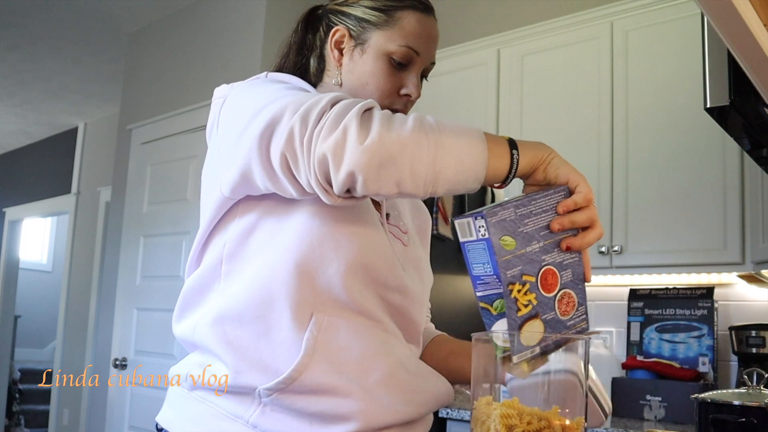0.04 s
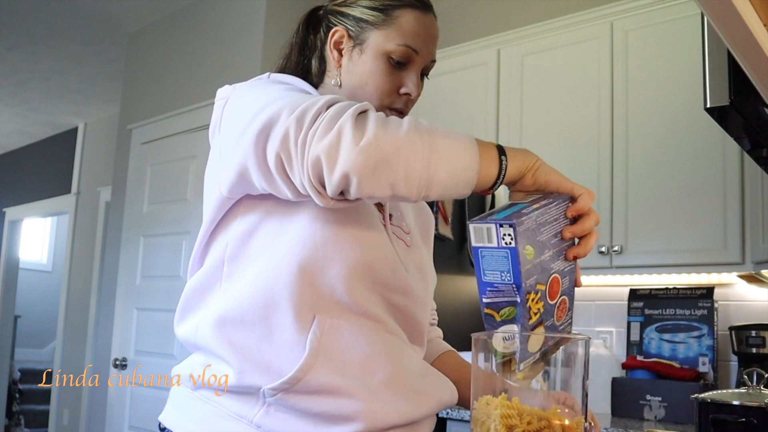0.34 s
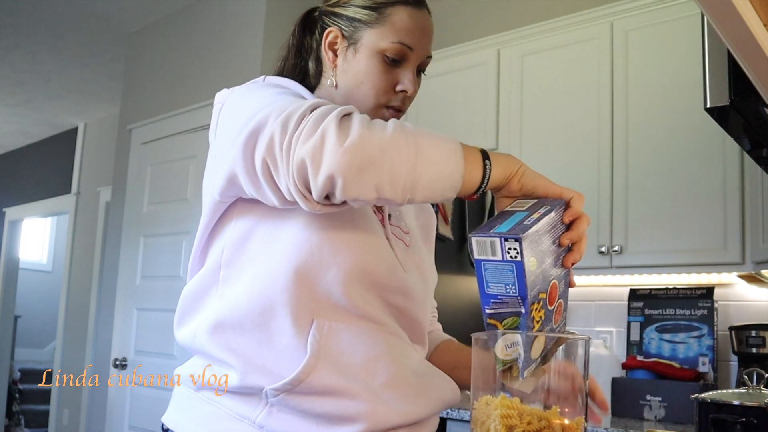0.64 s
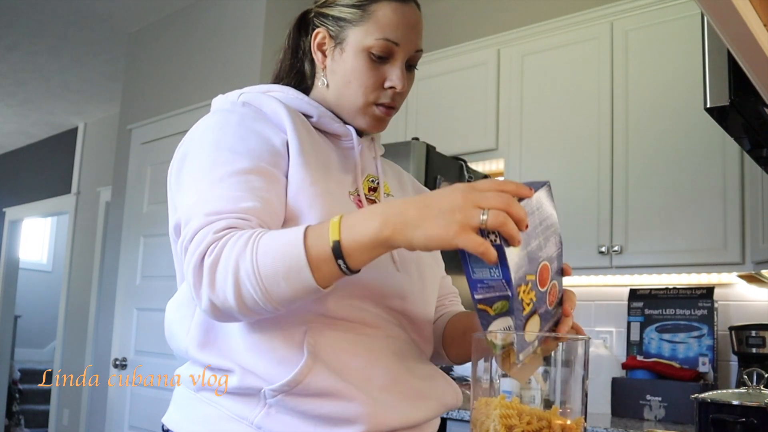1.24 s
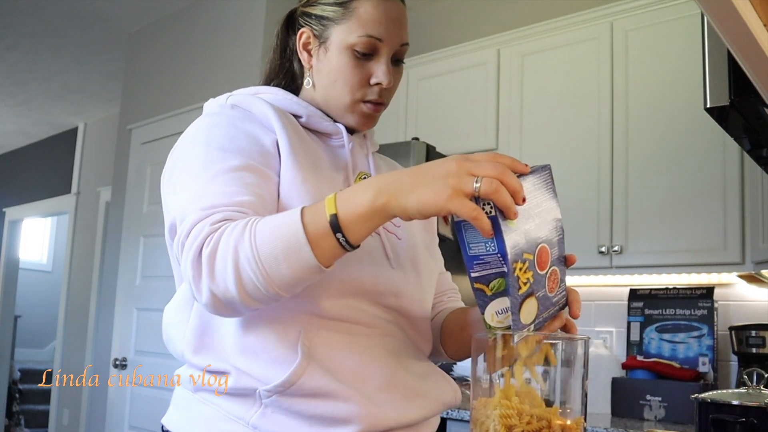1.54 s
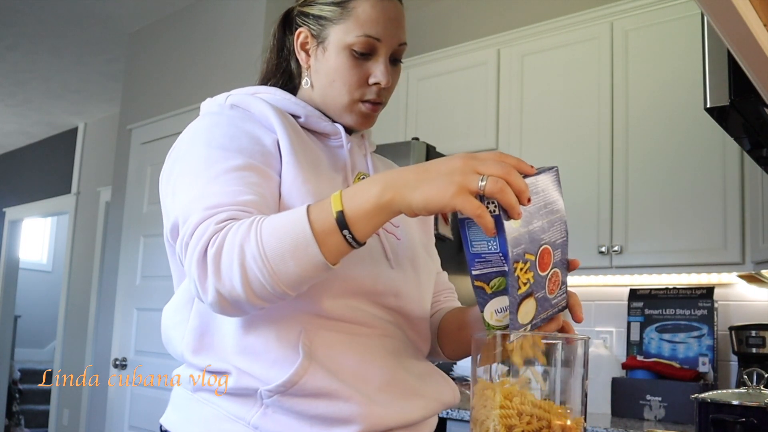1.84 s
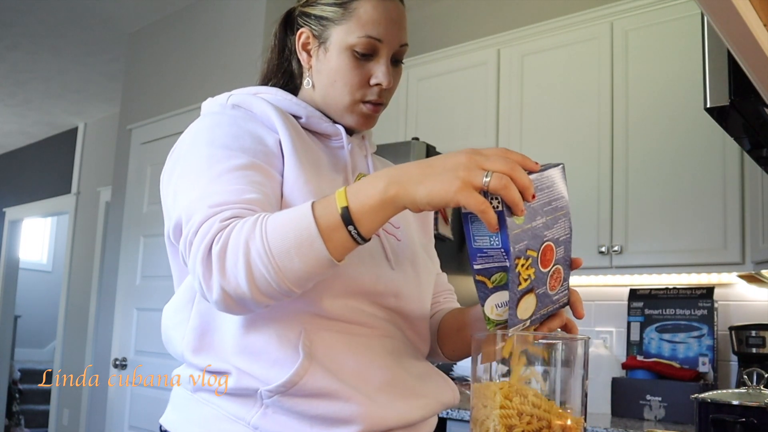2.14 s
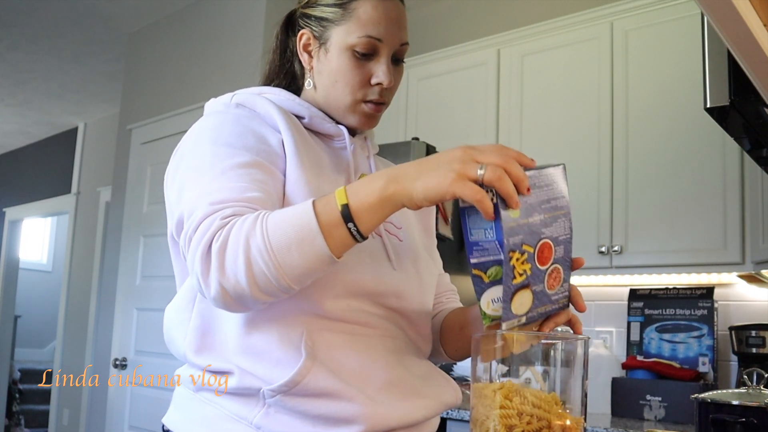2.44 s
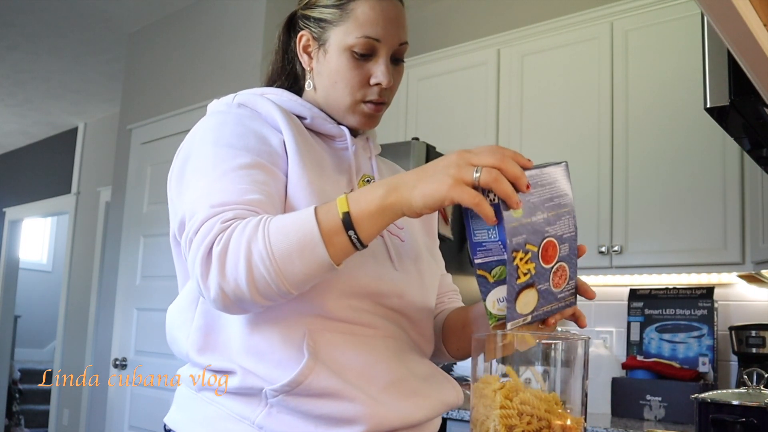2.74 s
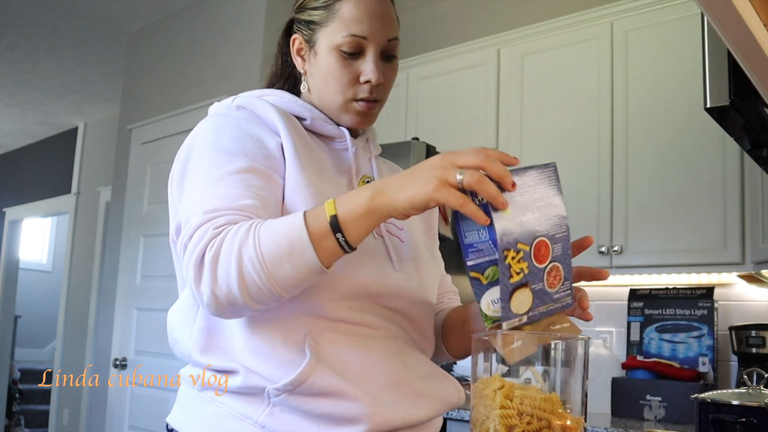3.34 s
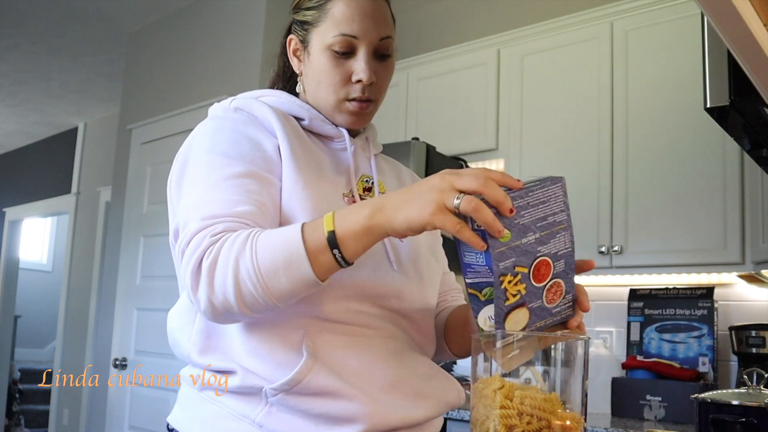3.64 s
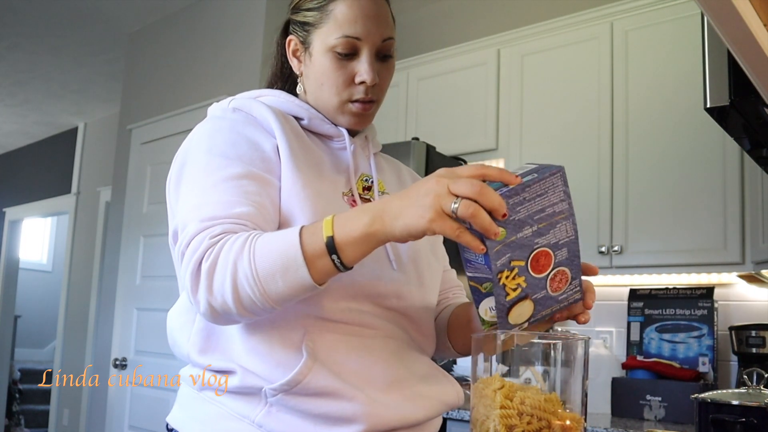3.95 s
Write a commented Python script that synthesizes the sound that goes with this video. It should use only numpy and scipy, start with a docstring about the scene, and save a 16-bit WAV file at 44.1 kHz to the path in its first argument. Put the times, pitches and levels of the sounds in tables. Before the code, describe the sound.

Dry pasta shifts in a cardboard box, and something hard knocks twice on a counter. The pasta then rattles into a plastic jar, thinning to clumps before the box thumps. It is heard close up in a softly humming kitchen.

```python
"""A quiet kitchen with a low hum. Dry pasta slides about in a cardboard box, then pours into a
plastic jar: a dense rush that thins to single clumps. Early on, something hard is set down on the
counter with a double knock; at the end the box thumps and the rest slides back.
Each of these is a crowd of small contacts that crack and set the box, jar or counter ringing.
They are shaped in three bands: body (low), clack (middle) and tick (high)."""
import sys
import numpy as np
from scipy import signal
from scipy.fft import rfft, irfft
from scipy.io import wavfile
from scipy.ndimage import uniform_filter1d

SR = 44100
rng = np.random.default_rng(int(sys.argv[2]) if len(sys.argv) > 2 else 0)


def write(x):
    x = np.atleast_2d(x).T
    wavfile.write(sys.argv[1], SR, np.round(np.clip(x, -1, 1) * 32767).astype(np.int16))


N = 176400


def amp(db):
    """Turn decibels into a gain."""
    return 10 ** (np.asarray(db) / 20)

def unit(x):
    """Scale a sound so its energy is 1."""
    return x / np.sqrt(np.sum(x ** 2) + 1e-18)

def fade(t, t60):
    """Die away by 60 dB every t60 seconds; the tables call this time ring_s."""
    return np.exp(-np.log(1000) * t / t60)

def on_log_axis(table, hz):
    """Read between a table's rows, giving each octave equal room."""
    points = np.array(table, float)
    return np.interp(np.log(hz + 1), np.log(points[:, 0]), points[:, 1])

def colour(x, table):
    """Turn pitches up or down by a table of pitch_hz, level_db."""
    cepstrum = irfft(np.log(amp(on_log_axis(table, np.linspace(0, SR / 2, 4097)))))
    cepstrum[1:4096] *= 2
    cepstrum[4097:] = 0  # so the filter never sounds ahead of a hit
    return signal.fftconvolve(x, irfft(np.exp(rfft(cepstrum))))[:len(x)]

def split(x, low_hz=1100, high_hz=5000):
    """Cut a sound into body, clack and tick."""
    def cut(sound, hz, kind):
        return signal.lfilter(*signal.butter(4, hz, kind, fs=SR), sound)
    clack = cut(cut(x, high_hz, "low"), low_hz, "high")
    return [cut(x, low_hz, "low"), clack, cut(x, high_hz, "high")]

# The tone of one dry contact: pitch_hz, level_db
CRACK_TONE = [(60, -47.5), (200, -11.5), (350, -2.5), (1000, 0.5), (2200, -2.5), (3500, -6), (5500, -10),
              (8000, -9.5), (11300, -3.5), (13000, -24), (16000, -81)]
def crack(envelope):
    """Hard things touch with a short burst of noise."""
    return unit(colour(rng.standard_normal(SR // 2)[:len(envelope)] * envelope, CRACK_TONE))

def ring(notes, t, pitch=1, spot_db=3, detune=.028):
    """A struck object rings at its own notes; each spot shifts them and favours different ones."""
    out = 0
    for hz, db, ring_s in notes:
        shift, spot, side = rng.standard_normal(3)
        note = fade(t, ring_s) * np.sin(2 * np.pi * hz * pitch * (1 + detune * shift) * t)
        out += np.sign(side) * amp(db + spot_db * np.clip(spot, -1, 1)) * unit(note)
    return out

def piece(notes, crack_db, crack_s):
    """One piece lands: a crack, the container's ring and its own short, high ring."""
    t = np.arange(SR // 10) / SR
    own_hz = rng.uniform(2700, 12150, size=4)
    own_ring = sum(unit(fade(t, t60=.012) * np.sin(2 * np.pi * hz * t)) for hz in own_hz)
    hit = amp(crack_db) * crack(fade(t, crack_s)) + ring(notes, t) + amp(-17.5) * own_ring
    return np.array([unit(band) for band in split(hit)])

def stream(table, notes, peak_per_s, scatter_db, crack_db, crack_s, gain_db, kinds=24):
    """Pieces land at random, tumbling in bunches; a stronger flow has more of them."""
    rows, t = np.array(table, float), np.arange(N) / SR
    times = rows[:, 0]
    levels = [amp(np.interp(t, times, rows[:, k + 1]) + gain_db[k]) for k in range(3)]
    gate = np.interp(t, [times[0] - .02, times[0], times[-1], times[-1] + .022], [0, 1, 1, 0])
    rate = peak_per_s * (levels[1] / levels[1].max()) ** .45
    strength = amp(np.outer(scatter_db, np.clip(rng.standard_normal(N), -2, 2)))
    force = (rng.random(N) < rate / SR) * strength * rng.choice([-1, 1], N)
    power = uniform_filter1d(uniform_filter1d(force ** 2, size=2000), size=2000)
    force *= gate / np.sqrt(power + 1e-5)  # even out the flow so the table shapes its loudness
    bunch_s, bunch_db = .012, (.7, 1, 3)
    bunch = np.clip(rng.standard_normal(N), -1.5, 1.5)[(t / bunch_s).astype(int)]
    force *= amp(np.outer(bunch_db, bunch))
    pieces = [piece(notes, crack_db, crack_s) for _ in range(kinds)]
    which = rng.integers(kinds, size=N)
    out = np.zeros((3, N + SR))
    for at in np.flatnonzero(force[0]):
        sound = pieces[which[at]]
        out[:, at:at + sound.shape[1]] += force[:, at, None] * sound
    return levels * out[:, :N]

def blows(table, notes, crack_db, crack_s, follow, gain_db, length_s=.12, count=9):
    """Each blow is one contact with a few more close behind; follow sets how strong those are."""
    out, t = np.zeros((3, N + SR)), np.arange(int(length_s * SR)) / SR
    push_s, level_s = .0011, .025  # the force's build-up; the opening stretch that sets the level
    contact = fade(t, crack_s) * (1 - np.exp(-t / push_s))
    for row in table:
        start_s, spread_ms, levels, pitch = row[0], row[1], row[2:5], row[5:]
        late = np.clip(rng.exponential(size=count), 0, 3)
        delays = np.minimum(late * spread_ms * SR / 1000, len(t) - 1).astype(int)
        force = np.zeros(len(t))
        force[0] = 1
        np.add.at(force, delays, follow * rng.standard_normal(count) * np.exp(-late / 2))
        envelope = np.sqrt(np.abs(signal.fftconvolve(force ** 2, contact ** 2)[:len(t)]))
        hit = amp(crack_db) * crack(envelope)
        hit += signal.fftconvolve(unit(force), ring(notes, t, *pitch))[:len(t)]
        at = int(start_s * SR)
        for k, band in enumerate(split(hit)):
            opening_level = np.sqrt(np.mean(band[:int(level_s * SR)] ** 2))
            out[k, at:at + len(t)] += band * amp(levels[k] + gain_db[k]) / opening_level
    return out[:, :N]

# The notes of the cardboard box: pitch_hz, level_db, ring_s
BOX_NOTES = [(362, -7, 0.01), (486, -6, 0.044), (651, -2.5, 0.055), (724, -0.5, 0.11), (921, -9.5, 0.092),
             (1100, -3, 0.015), (1660, 1.5, 0.028), (2095, 3, 0.019), (2770, 0.5, 0.0037)]
# The flow of pasta in the box: time_s, body_db, clack_db, tick_db
BOX_FLOW = [(0, -14, -16, -39), (0.12, -18.5, -20, -28), (0.15, -22, -24, -43), (0.21, -20.5, -17.5, -38),
            (0.28, -25.5, -31, -47), (0.335, -27.5, -29, -34), (0.4, -27, -28.5, -48),
            (0.45, -44, -41, -49), (0.65, -28, -46, -49), (0.7, -27, -44.5, -76), (0.8, -56, -59, -59),
            (0.88, -41, -44.5, -54), (0.95, -33, -39.5, -58), (1.01, -39.5, -38, -50),
            (1.04, -52, -51.5, -80), (1.14, -45, -47.5, -51), (1.2, -32.5, -32, -50),
            (1.3, -32, -33.5, -56), (1.4, -35.5, -37.5, -46)]
# Bumps inside the box: start_s, spread_ms, body_db, clack_db, tick_db
BOX_BUMPS = [(.157, 3.4, -36, -44, -50), (.35, 2.38, -24.5, -28, -41), (.362, 5.4, -21, -28.5, -50),
             (.915, 4, -34.5, -47, -49), (1.168, 7, -35, -35.5, -45), (3.412, 2.71, -25.5, -23, -62),
             (3.423, 4.7, -19, -28.5, -66), (3.446, 6.8, -20.5, -42, -65)]
def pasta_in_box():
    """Pasta slides and bumps against the cardboard, which rings briefly."""
    slide = stream(BOX_FLOW, BOX_NOTES, peak_per_s=1500, scatter_db=(5, 5, 4),
                   crack_db=11.5, crack_s=.0041, gain_db=(-4, -3.5, -3))
    bumps = blows(BOX_BUMPS, BOX_NOTES, crack_db=-1.5, crack_s=.015, follow=.91, gain_db=(-2.5, -2, -2))
    return slide + bumps

def noise(tone):
    """Steady noise with the given tone and an average power of 1."""
    return unit(colour(rng.standard_normal(N + SR), tone)[SR:]) * np.sqrt(N)

# How loud the hands are: time_s, level_db
HAND_LEVELS = [(0, -33), (.45, -67), (1.1, -59), (1.2, -34), (1.45, -81), (1.7, -42), (2.4, -48),
               (2.8, -36.5), (3.3, -40.5), (3.75, -42), (3.83, -36), (4.0, -31)]
# The tone of their rumble: pitch_hz, level_db
HAND_TONE = [(30, -3), (70, -10), (105, 10.5), (160, -15.5), (240, -1), (400, -34)]
def hands_on_box():
    """Handling the box makes a low rumble that swells and sinks."""
    return noise(HAND_TONE) * amp(np.interp(np.arange(N) / SR, *np.array(HAND_LEVELS).T))

# The tone of the room's steady noise: pitch_hz, level_db
ROOM_TONE = [(20, -32), (42, -3), (58, 11.5), (75, 0), (105, 5), (145, 6.5), (200, -7), (400, -18),
             (800, -17), (2000, -21.5), (6000, -25.5), (16000, -48)]
def kitchen_hum(air_db=-38, hum_hz=59, hum_db=-52):
    """An appliance hums over room rumble that is nearly the same in both ears."""
    air = noise(ROOM_TONE) + .084 * np.array([noise(ROOM_TONE), noise(ROOM_TONE)])
    hum = np.sqrt(2) * np.sin(2 * np.pi * hum_hz * np.arange(N) / SR)
    return amp(air_db) * air + amp(hum_db) * hum

# The notes of the plastic jar: pitch_hz, level_db, ring_s
JAR_NOTES = [(334.6, -5.5, 0.074), (358.3, 1, 0.096), (395.9, 6.5, .08), (431.6, 5, 0.066), (493, 3, 0.064),
             (630, -14, .03), (704, -0.5, 0.13), (753.6, -1.5, 0.093), (915, -0.5, 0.059),
             (1137, -7.5, .04), (1655, -4.5, 0.08), (2102, -5.5, 0.047), (2305, -5.5, .023),
             (2579, -7.5, 0.07), (3806, -9.5, 0.018)]
# Clumps landing: start_s, spread_ms, body_db, clack_db, tick_db, pitch_ratio
JAR_CLUMPS = [(.043, 3.5, -19, -21, -25.5, 1.1), (.063, 6.1, -20, -29, -19.5, 1.09),
              (.229, 8.9, -29, -24, -26.5, 1.3), (.312, 6.1, -52, -33, -38.5, 0.9),
              (.456, 4.7, -60, -38, -46, 1.4), (1.2, 4.2, -30.5, -48, -57, .92),
              (1.424, 4.4, -27, -43, -39, 1), (1.444, 4, -29.5, -46, -39, 1.06),
              (1.486, 4.6, -47, -37.5, -32, 1), (1.574, 7.5, -28, -27, -24, 1),
              (1.629, 10, -22.5, -23, -43, .98), (1.648, 5, -23.5, -25, -35, 0.84),
              (1.689, 7.7, -15.5, -31, -34, 0.99), (1.701, 7.7, -31, -21.5, -18, 0.92),
              (1.718, 12, -31, -19, -14.5, 1.14), (1.731, 4.9, -37, -30, -29, 0.99),
              (1.798, 2.4, -23.5, -16.5, -28, 1.02), (1.814, 8.7, -27, -22, -19, 1.4),
              (1.853, 5, -26, -21, -37, 1.22), (1.881, 4.6, -26, -31, -21.5, 1.07),
              (1.907, 6.9, -34, -20.5, -24, 0.99), (1.999, 5.8, -35, -27, -26.5, 0.83),
              (2.028, 7.47, -19, -26, -44, 0.98), (2.044, 6.6, -35, -26, -32, 1.2),
              (2.142, 6.6, -25.5, -26.5, -36, 0.95), (2.272, 2.25, -28, -25.5, -39, .98),
              (2.284, 5.6, -30.5, -26.5, -25, 1.08), (2.317, 3.3, -31, -22, -20, 1.05),
              (2.327, 5.8, -29, -35, -24, 1.21), (2.337, 4.4, -34, -28, -27, 0.97),
              (2.367, 2.9, -26.5, -50, -42, 0.85), (2.445, 2.8, -34, -31, -49, 1.4),
              (2.518, 4, -26.5, -30.5, -48, 1.04), (2.589, 5.3, -27, -25.5, -32, 0.91),
              (2.624, 4.9, -19, -23.5, -33, 1.22), (2.651, 9.9, -24, -24.5, -30.5, 1.1),
              (2.659, 3.9, -30, -29, -52, 1.15), (2.718, 1.8, -25, -23.5, -43, 1),
              (2.746, 3, -28, -30, -31, 1.19), (2.756, 3.9, -26, -34, -27.5, 1.04),
              (2.791, 5.8, -24.5, -29.5, -55, 1.2), (2.823, 6.3, -30, -34, -34, 1.24),
              (2.852, 4.1, -27.5, -52, -55, 0.81), (2.882, 5.6, -27.5, -54.5, -29, 1.1),
              (2.895, 5.2, -25.5, -32.5, -37, 0.96), (2.945, 4.15, -27.5, -34, -37, 1.03),
              (3.033, 3.9, -22, -28, -27.5, 1.22), (3.229, 2.26, -40, -37, -68, 1.2),
              (3.395, 6, -27, -49.5, -43.5, 0.82), (3.49, 2.56, -22.5, -19.5, -14, 1.16),
              (3.501, 13.3, -26.5, -28, -32, 1.3), (3.555, 3.35, -18.5, -22.5, -28, 1),
              (3.616, 5.8, -42, -39, -53, 1.1), (3.663, 7.74, -27.5, -29, -42, 1.03),
              (3.856, 2.4, -38, -36.5, -39, 1.15)]
# The flow into the jar: time_s, body_db, clack_db, tick_db
JAR_FLOW = [(1.4, -39, -32, -61), (1.52, -28, -25, -37), (1.6, -20.5, -20.5, -24),
            (1.67, -18, -17.5, -18.5), (1.75, -23.5, -17.5, -17), (1.78, -25, -25, -19.5),
            (1.85, -25.5, -20, -17.5), (1.95, -21.5, -21.5, -23.5), (2.02, -19.5, -18.5, -22),
            (2.12, -25, -25.5, -24.5), (2.24, -28.5, -29.5, -26.5), (2.41, -36.5, -39.5, -32.5),
            (2.44, -31.5, -33, -36), (2.48, -21.5, -24.5, -33.5), (2.57, -31, -31.5, -33),
            (2.69, -31, -33.5, -64), (2.96, -32.5, -34, -29), (3.1, -33, -41, -55),
            (3.2, -39.5, -44.5, -55), (3.36, -40, -39, -50.5), (3.62, -35.5, -45.5, -48),
            (3.78, -38, -45.5, -49), (3.87, -34, -49.5, -65)]
def pasta_into_jar():
    """Pasta falls in clumps and in a rush, setting the plastic ringing."""
    clumps = blows(JAR_CLUMPS, JAR_NOTES, crack_db=8, crack_s=.011, follow=.86, gain_db=(-2.2, -2, -.3))
    pour = stream(JAR_FLOW, JAR_NOTES, peak_per_s=1400, scatter_db=(3, 5, 9),
                  crack_db=7.5, crack_s=.0053, gain_db=(-2.8, -3.2, -5))
    return clumps + pour

# The notes of the counter: pitch_hz, level_db, ring_s
COUNTER_NOTES = [(300, -5, 0.059), (400, 1, 0.23), (514, 10.5, 0.032), (668, 2, 0.087), (747.5, 4, 0.18),
                 (1470, -6, .025), (2080, -5, 0.044), (2850, -10, 0.025)]
# The two knocks: start_s, spread_ms, body_db, clack_db, tick_db
KNOCKS = [(.512, 6, -19, -16, -23.5), (.547, 1.64, -16, -16, -16.5)]
# Their overall tone: pitch_hz, level_db
KNOCK_TONE = [(100, 4.5), (1000, -4), (2000, -4), (2900, 2.5), (4300, 4.5), (6200, -1.5), (11000, -0.5)]
def counter_knocks():
    """Something hard is set down and strikes the counter twice."""
    bands = blows(KNOCKS, COUNTER_NOTES, crack_db=7.5, crack_s=.0079, follow=.49,
                  gain_db=(-2, -2, -2), length_s=.33)
    return np.array([colour(band, KNOCK_TONE) for band in bands])

# The deep notes of the counter's slab: pitch_hz, level_db, ring_s
SLAB_NOTES = [(126, -6, 0.14), (147, 2, 0.25)]
# When the slab booms: start_s, level_db
SLAB_BOOMS = [(.525, -16.5), (0.559, -28), (.592, -17)]
def counter_booms():
    """The slab rings low just after the knocks."""
    out = np.zeros(N)
    for start_s, level_db in SLAB_BOOMS:
        t = np.maximum(np.arange(N) / SR - start_s, 0)
        for hz, db, ring_s in SLAB_NOTES:
            out += amp(level_db + db) * fade(t, ring_s) * np.sin(2 * np.pi * hz * t)
    return out

# The notes of the box's wall: pitch_hz, level_db, ring_s
WALL_NOTES = [(98, 4, 0.063), (147, -2, 0.068), (288, -6, 0.02), (380, 1, 0.034), (520, -3, 0.043),
              (707, -4, 0.078), (759, -4.5, .15), (1600, 5.5, 0.019), (2380, 9, 0.0065)]
# The closing thumps: start_s, spread_ms, body_db, clack_db, tick_db
THUMPS = [(3.821, 4, -25.5, -42, -51), (3.898, 1.64, -11.5, -17.5, -48), (3.904, 2.44, -13.5, -35, -60)]
def box_thumps():
    """Blows on the cardboard wall bring out its low, hollow notes."""
    return blows(THUMPS, WALL_NOTES, crack_db=-3.5, crack_s=.014, follow=.21,
                 gain_db=(-1.5, -2, -1), length_s=.2)

# The notes of the box's flap: pitch_hz, level_db, ring_s
FLAP_NOTES = [(370, -2, 0.028), (746, 3, .07), (840, 6, .06), (1400, -1, 0.056), (1620, 7, 0.023),
              (2170, -9, 0.018)]
# The flow back into the box: time_s, body_db, clack_db, tick_db
BACK_FLOW = [(3.92, -22, -44, -68), (3.936, -25, -43, -68), (3.946, -23, -41.5, -71),
             (3.965, -19, -36.5, -65), (4.0, -22.5, -27.5, -60)]
def pasta_slides_back():
    """The rest of the pasta slides back, ringing the flap with a dull rush."""
    return stream(BACK_FLOW, FLAP_NOTES, peak_per_s=2200, scatter_db=(4, 4, 4),
                  crack_db=-13, crack_s=.0058, gain_db=(-2, -2, -6), kinds=8)

def echoes(x, t60, delay_ms):
    """After a short wait, a sound comes back as a dense, fading cloud of echoes."""
    t = np.arange(int(1.2 * t60 * SR) + 2) / SR
    cloud = unit(rng.standard_normal(N)[:len(t)] * fade(t, t60))
    return signal.fftconvolve(x, np.pad(cloud, (SR * delay_ms // 1000, 0)))[:N]

def kitchen_room(bands, room_db, ring_s=(.82, .51, .21)):
    """Each ear gets the direct sound, quick echoes off counter and cabinets, and the room's tail."""
    direct, ears = bands.sum(axis=0), []
    for ear in range(2):
        # The quick echoes drift as hands, box and heap move.
        drift = 6 * np.cumsum(rng.standard_normal(N)) / np.sqrt(SR)
        early = sum(echoes(direct * share, .05, delay_ms=1) for share in (np.cos(drift), np.sin(drift)))
        late = sum(amp(db) * echoes(band, t60, delay_ms=10)
                   for band, t60, db in zip(bands, ring_s, room_db))
        ears.append(direct + amp(-4) * early + late)
    return np.array(ears)

def scene():
    """Box and jar close by, the counter knocks a little farther off."""
    pasta = pasta_in_box() + pasta_into_jar() + box_thumps() + pasta_slides_back()
    near = kitchen_room(pasta, room_db=(-10, -8, -12))
    far = kitchen_room(counter_knocks(), room_db=(-5.5, -2, -8))
    return near + far + counter_booms() + hands_on_box() + kitchen_hum()

# The tone of both microphones: pitch_hz, level_db
MIC_TONE = [(25, -23), (60, -6.5), (160, -4), (270, 1), (400, 2), (580, -4), (750, 0), (1150, 0),
            (2000, 0.5), (4000, 0.5), (7000, 1.5), (11500, -5.5), (13000, 5), (15500, -10)]
# Which side is louder: pitch_hz, left_minus_right_db
MIC_BALANCE = [(60, 0), (130, -.3), (200, -1.5), (380, -1.5), (700, -3.5), (920, -4), (1100, 2), (1400, 0),
               (2200, -4.5), (4400, -1.5), (15000, -.5)]
# How far the right side's wave trails the left: pitch_hz, lag_radians
MIC_LAG = [(20, 0), (780, 0.53), (1380, 4), (2240, 4.5), (3190, 4.5), (4000, 3.5), (5800, 3.5), (15000, 3)]
def record(dry, shared_below_hz=520, top_hz=16300):
    """Two microphones agree in the bass and oppose in the treble; peaks clip and the top is cut."""
    hz = np.linspace(0, SR / 2, N + 1)
    mirrored = np.concatenate([dry, dry[:, ::-1]], axis=1)  # avoids a click at the ends
    left, right = rfft(mirrored) * amp(on_log_axis(MIC_TONE, hz))
    shared = 1 / (1 + (hz / shared_below_hz) ** 4)
    apart = np.sqrt(1 - shared ** 2)
    right = (shared * left + apart * right) / np.sqrt(1 + 2.2 * shared * apart)
    lean = amp(on_log_axis(MIC_BALANCE, hz) / 2)
    lag = np.exp(-1j * on_log_axis(MIC_LAG, hz))
    stereo = irfft(np.array([left * lean, right / lean * lag]))[:, :N]
    top_cut = signal.ellip(8, .2, 70, top_hz, fs=SR, output="sos")
    return signal.sosfilt(top_cut, np.clip(stereo, -1, 1))


dry = scene()
out = record(dry)
write(out)
```